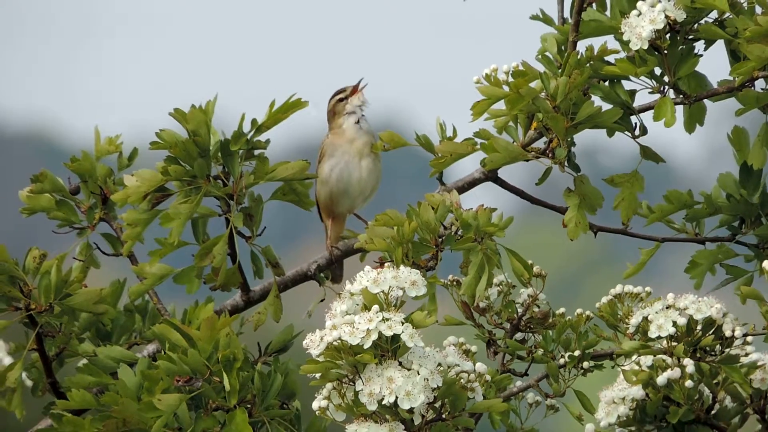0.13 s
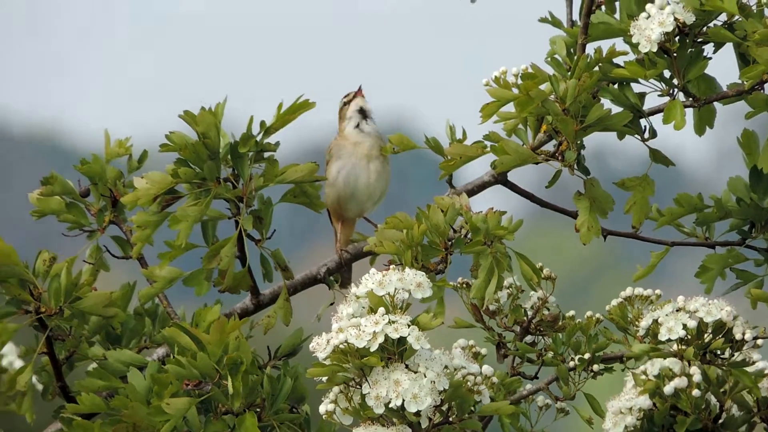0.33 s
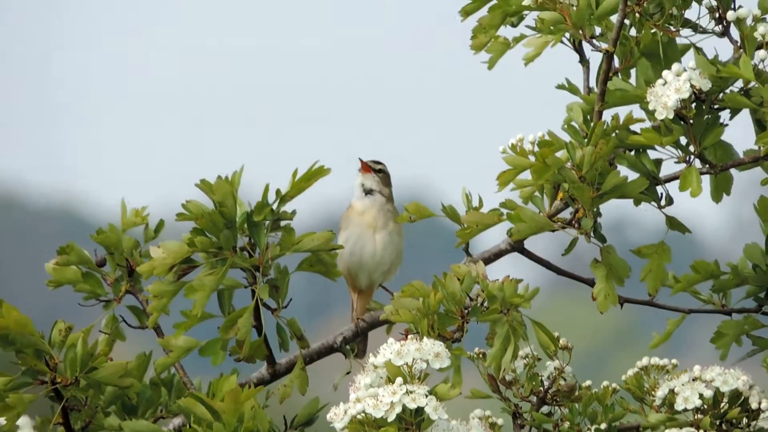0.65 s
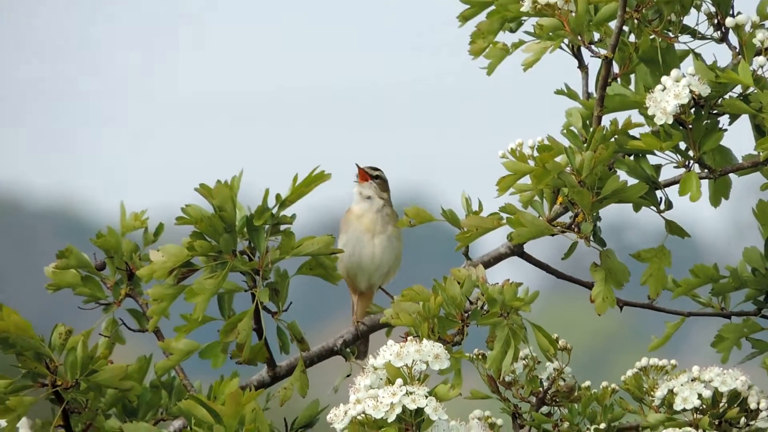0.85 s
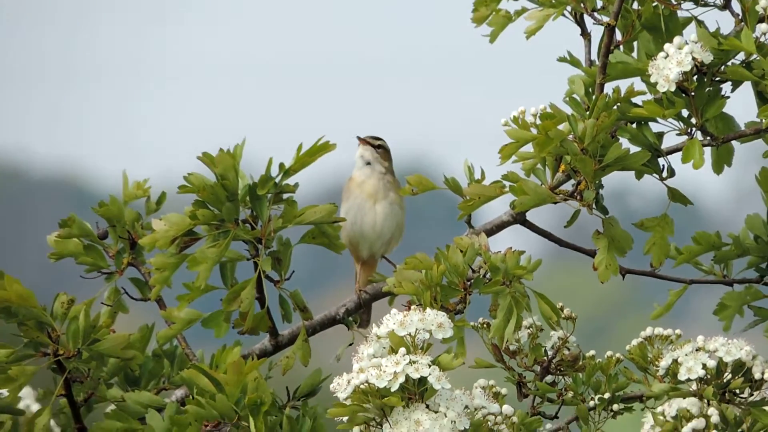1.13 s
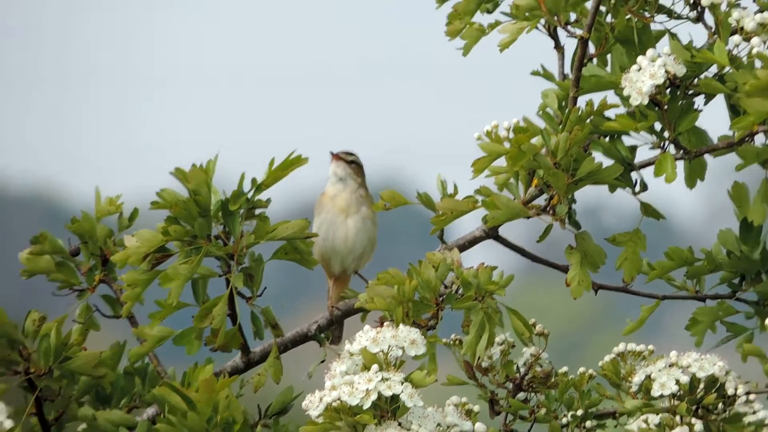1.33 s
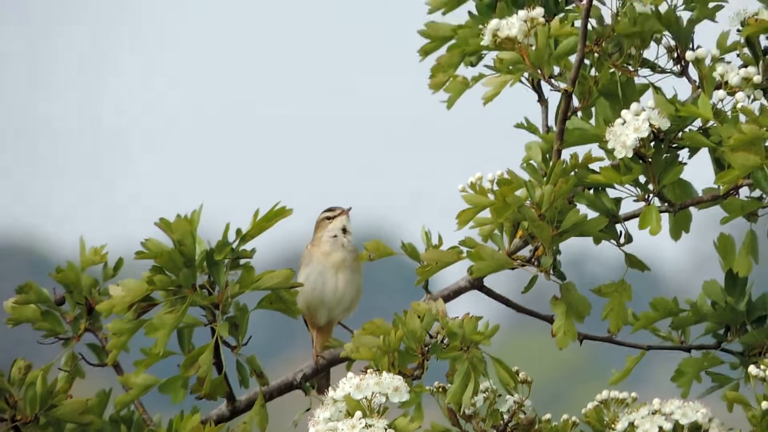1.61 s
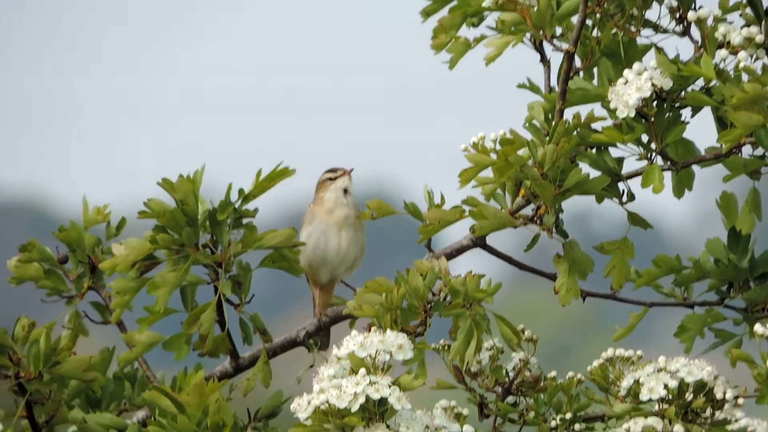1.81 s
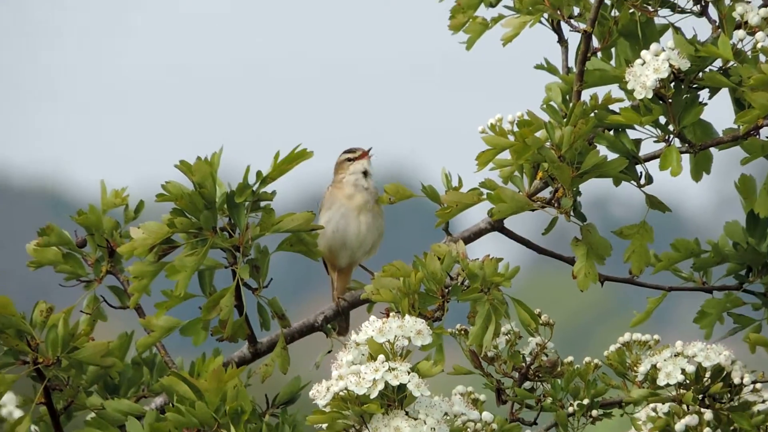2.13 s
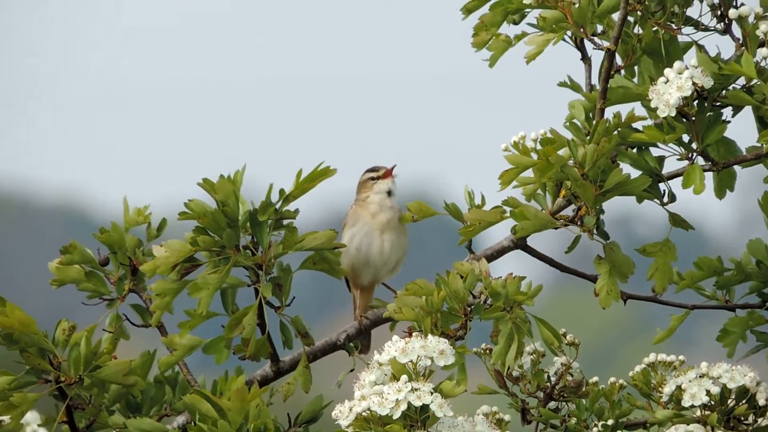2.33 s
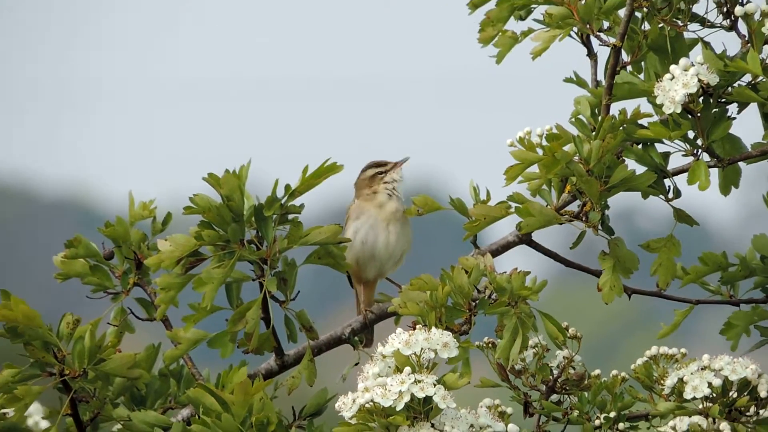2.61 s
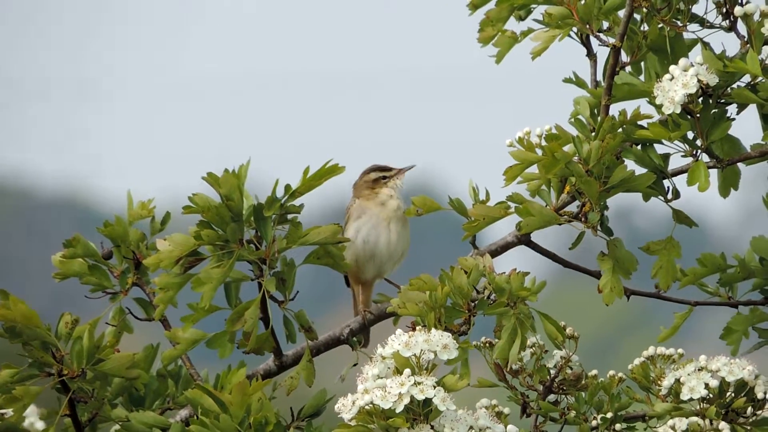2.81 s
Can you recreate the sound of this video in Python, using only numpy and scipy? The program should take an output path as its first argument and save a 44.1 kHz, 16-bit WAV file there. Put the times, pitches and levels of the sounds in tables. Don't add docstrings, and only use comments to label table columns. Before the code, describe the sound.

Small songbird chatters in dry scratchy bursts with a brief rising whistle, wind buffeting the microphone.

```python
import sys
import numpy as np
from scipy import signal
from scipy.fft import rfft, irfft
from scipy.io import wavfile
from scipy.ndimage import uniform_filter1d

SR = 44100
rng = np.random.default_rng(int(sys.argv[2]) if len(sys.argv) > 2 else 0)


def boost_factor(decibels):
    exponent = np.asarray(decibels, float) / 20
    return 10 ** exponent


def output_pcm(signal):
    pcm = np.clip(np.atleast_2d(signal).T, -1, 1) * 32767
    wavfile.write(sys.argv[1], SR, np.round(pcm).astype(np.int16))


N = 130095
T = np.arange(N) / SR

# last click in seconds, level in dB, time stretch, low throat in dB, held note in Hz.
RATTLES = [
    (0.544, -56, 1.07, 1.5, 5550),
    (.704, -52, 1.02, 0.2, 6350),
    (1.092, -55, .92, -.2, 5950),
    (1.277, -56, 1.01, 1.7, 6200),
    (1.805, -57.5, 0.94, 0.5, 6300),
    (2.146, -55, 0.94, 0, 6200),
    (2.364, -58.5, 1.02, 3.5, 6300),
    (2.577, -57, 1.14, 2, 6500),
    (2.796, -57, 1.14, 1.5, 6500),
]
# lead in seconds, length in seconds, high throat in dB, low throat in dB.
RATTLE_CLICKS = [
    (0.0573, 0.0064, 0.5, -6),
    (0.0425, 0.013, 0, -7.5),
    (0.0238, 0.012, -5, -0.5),
    (0.00014, 0.011, -12, -1),
]
# time in seconds, level in dB.
PICKUP_CLICKS = [
    (.455, -59),
    (.467, -51),
    (.634, -56),
    (1.736, -62),
]
# centre in Hz, width in Hz, level in dB.
HIGH_THROAT = [(4806, 740, 6.6), (6200, 3800, -0.5), (7980, 1460, -13), (11800, 3000, -13.5),
               (14700, 1200, -11.5)]
LOW_THROAT = [(1884, 740, -3.5), (2500, 360, -7), (3380, 1210, -5)]
# start in seconds, level in dB, pitch in Hz, leading scratch in dB.
BUZZES = [
    (0.035, -60.5, 1224, -0.5),
    (1.410, -52.5, 1250, 2),
    (1.564, -51, 1250, -2),
    (1.932, -53, 1243, -2),
]
# multiple, level in dB.
BUZZ_PARTIALS = [(1, -36.5), (2, -7), (3, -11.5), (4, 0.5), (5, -9.5), (6, -8.5), (7, -18), (8, -32),
                 (9, -23), (10, -26.5), (11, -39), (12, -16)]
# time in seconds, pitch in Hz, level in dB.
WHISTLE = [
    (0.787, 2680, -65),
    (.797, 2640, -47),
    (0.82, 2685, -52.5),
    (0.84, 3210, -55),
    (0.868, 3344, -56.5),
    (0.902, 3806, -54.5),
    (.931, 3844, -56.5),
    (0.946, 3930, -61),
    (.96, 3916, -81),
]
# multiple, level in dB.
WHISTLE_PARTIALS = [(1, 0), (2, -19), (3, -28), (4, -38)]
# frequency in Hz, left over right in dB, left phase lead in radians.
PORT_BALANCE = [(2000, -1, -0.49), (3560, 9.5, .1), (3980, -1.5, 1), (5300, -12, 1), (6500, -13.5, -1.6),
                (8000, 9, -1.3), (12200, -4.5, 0.82)]
# start in seconds, level in dB, top pitch in Hz.
CHIRPS = [
    (.137, -64, 4330),
    (.194, -66, 4250),
    (.289, -64, 4230),
    (.344, -64, 4180),
]
# centre in Hz, width in Hz, level in dB.
CHIRP_RASP = [(3140, 1200, -1), (2510, 290, -5.5)]
# start in seconds, length in seconds, from in Hz, to in Hz, level in dB.
FLUTES = [(1.02, .08, 1880, 2100, -69), (1.09, .035, 2700, 2300, -66), (1.13, .03, 2700, 2150, -64),
          (1.17, .11, 1980, 2240, -70), (1.28, .17, 2240, 1940, -70), (1.52, .035, 2150, 2400, -65),
          (1.64, .04, 2750, 2650, -68), (1.68, .035, 2950, 2400, -66), (1.73, .1, 2100, 2060, -69),
          (.865, .035, 5100, 5600, -67), (2.46, .04, 5400, 5000, -73), (.28, .04, 4900, 5500, -76),
          (1.2, .31, 795, 855, -64), (1.7, .19, 800, 825, -63), (.55, .05, 3300, 2700, -69)]
# start in seconds, length in seconds, level in dB.
TRILLS = [
    (0.971, .07, -65.5),
    (1.124, 0.087, -68),
    (1.31, 0.11, -67.5),
]
# start in seconds, length in seconds, pitch in Hz, level in dB, third partial in dB.
BLEATS = [
    (1.06, .42, 492, -65, -7),
    (2.76, .4, 495, -67, -2.5),
]
# time in seconds, peak in dB, left over right in dB.
THUMPS = [
    (0.621, -24, -21.5),
    (0.692, -28.5, -5.5),
    (1.244, -36.5, -34),
    (1.319, -35.5, -30),
    (1.421, -39.5, -24),
    (1.61, -36.5, -12.5),
    (1.78, -26, 1),
    (2.112, -40.5, -21.5),
    (2.449, -31, -7),
]
# centre in Hz, width in Hz, level in dB.
THUMP_PEAKS = [(102, 175, 2), (245, 143, -9), (459, 250, -24)]
# time in seconds, level in dB.
GUSTS = [(0, -56), (.13, -45), (.4, -43), (.49, -38), (.58, -40.5), (.66, -31.5), (.8, -38), (.93, -48.5),
         (1.13, -32), (1.3, -35.5), (1.4, -44), (1.52, -49.5), (1.66, -36.5), (1.9, -40.5), (2.0, -42),
         (2.16, -43.5), (2.5, -41.5), (2.95, -50.5)]
# frequency in Hz, density in dB per Hz.
WIND_SPECTRUM = [(8.8, -39), (15, 1.5), (67, 2), (145, -9.5), (408, -34.5), (600, -53), (780, -42),
                 (1320, -120)]
# frequency in Hz, density in dB per Hz.
LEAF_SPECTRUM = [(180, -11), (300, -5.5), (1020, -3.5), (1400, -9.5), (1770, -9), (5470, -22), (13300, -32)]
# time in seconds, level in dB.
LEAF_LEVEL = [(0, -72), (.45, -61.5), (1.2, -61), (2.95, -61)]
# frequency in Hz, share.
LEAF_LIKENESS = [(600, 0.52), (2000, 0.05)]

CLICK_RATE_HZ, CLICK_ROUGHNESS = 798, 0.79
HELD_LEAD_S, HELD_S, HELD_DB = 0.068, 0.0437, -13.5
HELD_ROUGH_DB, HELD_ROUGH, HELD_ARCH = 5, 0.02, 0.035
SCRATCH_S, BUZZ_WAIT_S, BUZZ_S = 0.0077, 0.01355, 0.019
BUZZ_FLUTTER_DB, BUZZ_BREATH_DB, BUZZ_SAG, BUZZ_WOBBLE = 4, -12.5, 0.045, 0.008
BIRD_ECHO_DB, BIRD_ECHO_T60_S, SLAP_S, SLAP_DB = -16, 0.2, 0.062, -19
CHIRP_HOLD_S, CHIRP_FALL_S, CHIRP_END_HZ, CHIRP_ECHO_DB = 0.015, 0.007, 2800, -12
CHIRP_RASP_S, CHIRP_RASP_DB, CHIRP_RASP_RATE_HZ = 0.019, 5.5, 130
TRILL_HZ, TRILL_RATE_HZ, TRILL_SINK, TRILL_SWEEP = 5750, 190, 0.07, 0.16
BLEAT_SCOOP, BLEAT_WOBBLE, BLEAT_WOBBLE_DB = 0.06, 0.005, 1.5
THUMP_PEAK_S, THUMP_DB = 0.013, -7
BUFFET_DB, FLICKER_DB, WIND_PAN_DB = 2.5, 2.5, -7
GUST_TILT = 0.035
HISS_TOP_HZ, HISS_CUT_DB, MIC_HISS_DB = 13650, -40, -75


def on_log(hz, table, col=1):
    table = np.array(table, float)
    return np.interp(np.log(np.maximum(hz, 1)), np.log(table[:, 0]), table[:, col])


def colour(x, gain):
    return irfft(rfft(x) * gain(np.arange(N // 2 + 1) * SR / N), N)


def unit(x):
    return x / np.sqrt(np.mean(x ** 2))


def throat(x, peaks):
    def gain(f):
        return sum(boost_factor(db) / (1 + ((f - hz) * 2 / width) ** 4) for hz, width, db in peaks)
    return unit(colour(x, gain))


def walk(rate_hz):
    return unit(colour(rng.standard_normal(N), lambda f: 1 / (1 + (f / rate_hz) ** 2)))


def gate(start_s, length_s, edge):
    u = np.clip((T - start_s) / length_s, 0, 1)
    return u, np.sin(np.pi / 2 * np.clip(np.minimum(u, 1 - u) / edge, 0, 1))


def stack(hz, partials=((1, 0),)):
    phase = 2 * np.pi * np.cumsum(hz) / SR
    return np.sqrt(2) * sum(boost_factor(db) * np.sin(k * phase + k * k) for k, db in partials)


def tail(x, t60_s):
    n = int(SR * 0.4)
    ir = rng.standard_normal((2, n)) * boost_factor(-60 * T[:n] / t60_s)
    return signal.fftconvolve(x[None], ir / np.sqrt(np.sum(ir[0] ** 2)), axes=1)[:, :N]


def pan(x, left_db, right_db):
    return x * boost_factor(np.array([[left_db], [right_db]]))


def rattles(high, low, wobble):
    out = np.zeros(N)
    for last_s, db, stretch, open_db, hz in RATTLES:
        for lead_s, length_s, high_db, low_db in RATTLE_CLICKS:
            env = gate(last_s - lead_s * stretch - 0.001, length_s, 0.44)[1]
            out += env * boost_factor(db) * (boost_factor(high_db) * high + boost_factor(low_db + open_db) * low)
        u, env = gate(last_s - HELD_LEAD_S * stretch, HELD_S * stretch, 0.067)
        pitch_hz = hz * (1 + HELD_ROUGH * wobble + HELD_ARCH * (np.sin(np.pi * u) - 0.7))
        out += env * boost_factor(db + HELD_DB + HELD_ROUGH_DB * wobble) * stack(pitch_hz)
    for start_s, db in PICKUP_CLICKS:
        out += gate(start_s - 0.001, 0.0047, 0.48)[1] * boost_factor(db) * high
    return out


def buzzes(high, wobble):
    out = np.zeros(N)
    flutter = [BUZZ_FLUTTER_DB * walk(160) for _ in BUZZ_PARTIALS]
    partials = [(k, db + w * k / 6) for (k, db), w in zip(BUZZ_PARTIALS, flutter)]
    for start_s, db, hz, scratch_db in BUZZES:
        breath = gate(start_s + 0.0027, BUZZ_S + 0.012, 0.15)[1] * boost_factor(db + BUZZ_BREATH_DB)
        scratch = gate(start_s - 0.001, SCRATCH_S, 0.18)[1] * boost_factor(db + scratch_db)
        u, env = gate(start_s + BUZZ_WAIT_S, BUZZ_S, 0.083)
        bend = 1 - BUZZ_SAG * (1.6 * (u - 0.4)) ** 2 + BUZZ_WOBBLE * wobble
        out += (breath + scratch) * high
        out += env * boost_factor(db + 1.8 * wobble) * stack(hz * bend, partials)
    return out


def whistle(wobble):
    s, hz, db = np.array(WHISTLE).T
    pitch_hz = uniform_filter1d(np.interp(T, s, hz), size=500)
    level_db = np.interp(T, s, db, -140, -140) + 0.5 * wobble
    return boost_factor(level_db) * stack(pitch_hz, WHISTLE_PARTIALS)


def warbler():
    cycles = np.floor(np.cumsum(CLICK_RATE_HZ * (1 + 0.2 * walk(300))) / SR)
    rasp = unit(np.diff(cycles, prepend=0)) + CLICK_ROUGHNESS * rng.standard_normal(N)
    high, low, wobble = throat(rasp, HIGH_THROAT), throat(rasp, LOW_THROAT), walk(115)
    return rattles(high, low, wobble) + buzzes(high, wobble) + whistle(wobble)


def warbler_at_ports():
    bird = warbler()

    def port(f, side):
        phase = side * on_log(f, PORT_BALANCE, col=2) / 2
        return boost_factor(side * on_log(f, PORT_BALANCE) / 2) * np.exp(1j * phase)
    near = np.array([colour(bird, lambda f: port(f, side)) for side in (1, -1)])
    near[0] += boost_factor(SLAP_DB) * np.roll(bird, int(SLAP_S * SR))
    return near * boost_factor(0.5) + boost_factor(BIRD_ECHO_DB) * tail(bird, BIRD_ECHO_T60_S)


def chirps():
    out, rasp = np.zeros(N), throat(rng.standard_normal(N), CHIRP_RASP)
    tone_s = CHIRP_HOLD_S + CHIRP_FALL_S
    for start_s, db, hz in CHIRPS:
        fall = np.clip((T - start_s - CHIRP_HOLD_S) / CHIRP_FALL_S, -2.2, 1)
        drop = np.where(fall > 0, np.maximum(fall, 0) ** 1.3, 0.04 * fall ** 2)
        pitch_hz = hz - (hz - CHIRP_END_HZ) * drop
        out += gate(start_s, tone_s, 0.08)[1] * boost_factor(db + 6.1 * np.maximum(fall, 0)) * stack(pitch_hz)
        u, env = gate(start_s + tone_s, CHIRP_RASP_S, 0.14)
        pulse_db = 1.4 * np.sin(2 * np.pi * CHIRP_RASP_RATE_HZ * (T - start_s))
        out += env * rasp * boost_factor(db + CHIRP_RASP_DB - 8.4 * u + pulse_db)
    return pan(out, 2.5, -2.5) + boost_factor(CHIRP_ECHO_DB) * tail(out, 0.18)


def flutes(wobble):
    out = np.zeros(N)
    for start_s, length_s, from_hz, to_hz, db in FLUTES:
        u, env = gate(start_s, length_s, 0.2)
        pitch_hz = from_hz + (to_hz - from_hz) * (1 - np.cos(np.pi * u)) / 2
        out += env * boost_factor(db + 1.7 * wobble) * stack(pitch_hz)
    return out


def trills(wobble):
    out = np.zeros(N)
    beat = (TRILL_RATE_HZ * T + 0.6 * wobble) % 1
    for start_s, length_s, db in TRILLS:
        u, env = gate(start_s, length_s, 0.16)
        pitch_hz = TRILL_HZ * (1 - TRILL_SINK * u - TRILL_SWEEP * beat)
        out += env * boost_factor(db) * np.sin(np.pi * beat) * stack(pitch_hz)
    return out


def bleats(wobble):
    out = np.zeros(N)
    for start_s, length_s, hz, db, third_db in BLEATS:
        u, env = gate(start_s, length_s, 0.15)
        scoop = BLEAT_SCOOP * (np.exp(-u / 0.102) + u ** 4)
        voice = stack(hz * (1 - scoop + BLEAT_WOBBLE * wobble), [(1, -18), (2, 0), (3, third_db)])
        out += env * boost_factor(db + BLEAT_WOBBLE_DB * wobble) * voice
    return out


def far_calls():
    wobble = walk(24.4)
    calls, trill = flutes(wobble) + bleats(wobble), trills(wobble)
    return pan(calls, 1.5, -1.5) + pan(trill, -5, 3) + boost_factor(-8) * tail(calls + trill, 0.9)


def wind():
    s, db = np.array(GUSTS).T
    gust_db, ports = np.interp(T, s, db), []
    for side in (1, -1):
        out, buffet = np.zeros(N), walk(27)
        noise = unit(colour(rng.standard_normal(N), lambda f: boost_factor(on_log(f, WIND_SPECTRUM))))
        for k, hz in enumerate(16 * 2. ** np.arange(7)):
            def octave(f):
                return np.cos(np.pi / 2 * np.clip(np.log2(np.maximum(f, 1) / hz), -1, 1)) ** 2
            buffet_db = BUFFET_DB * buffet * (1.054 + 0.2 * k)
            flicker_db = FLICKER_DB * walk(hz / 5)
            tilt_db = GUST_TILT * (gust_db + 25) * k
            out += colour(noise, octave) * boost_factor(buffet_db + flicker_db + tilt_db)
        ports.append(out * boost_factor(gust_db + side * WIND_PAN_DB / 2))
    return np.array(ports)


def thumps():
    out = np.zeros((2, N))
    noise = np.array([throat(rng.standard_normal(N), THUMP_PEAKS) for _ in range(2)])
    for start_s, db, pan_db in THUMPS:
        age = np.maximum(T - start_s + 0.00676, 0) / THUMP_PEAK_S
        swell = np.e * age * np.exp(-age)
        out += pan(swell * noise, db + THUMP_DB + pan_db / 2, db + THUMP_DB - pan_db / 2)
    return out


def leaves():
    def hiss(f, sign):
        density_db = on_log(f, LEAF_SPECTRUM) + HISS_CUT_DB * (f > HISS_TOP_HZ)
        return boost_factor(density_db) * np.sqrt(1 + sign * on_log(f, LEAF_LIKENESS))
    mid = colour(rng.standard_normal(N), lambda f: hiss(f, 1))
    side = colour(rng.standard_normal(N), lambda f: hiss(f, -1))
    s, db = np.array(LEAF_LEVEL).T
    level_db = np.interp(T, s, db) + 2.5 + 0.59 * walk(3.8)
    return np.array([mid + side, mid - side]) / np.std(mid) * boost_factor(level_db)


def scene():
    return warbler_at_ports() + chirps() + far_calls() + wind() + thumps() + leaves()


def top_cut(x):
    return signal.sosfilt(signal.butter(12, 15890, fs=SR, output="sos"), x)


def record(dry):
    hiss = [unit(colour(rng.standard_normal(N), lambda f: 1. * (f < HISS_TOP_HZ))) for _ in dry]
    return top_cut(dry + boost_factor(MIC_HISS_DB) * np.array(hiss))


dry = scene()
out = record(dry)
output_pcm(out)
```